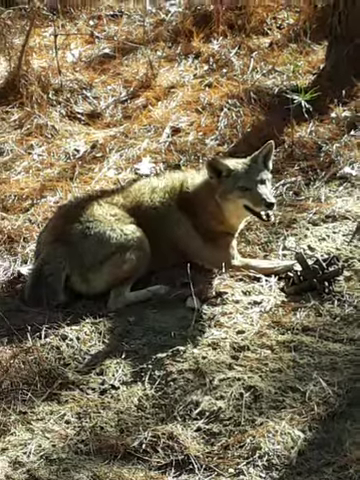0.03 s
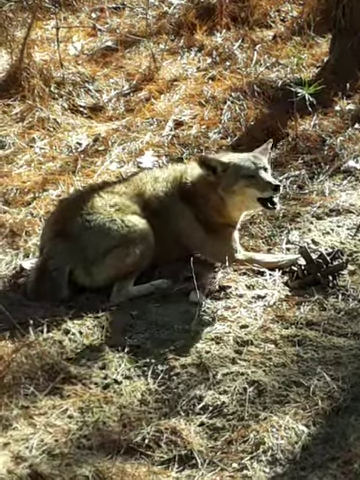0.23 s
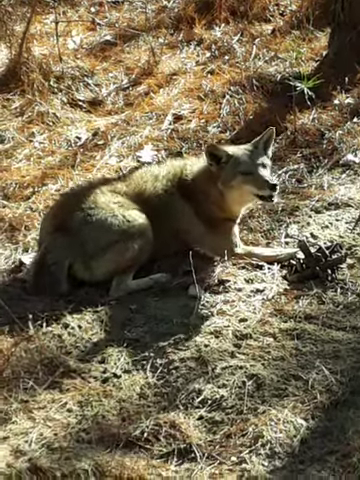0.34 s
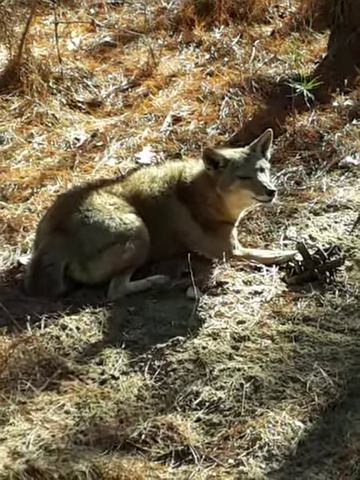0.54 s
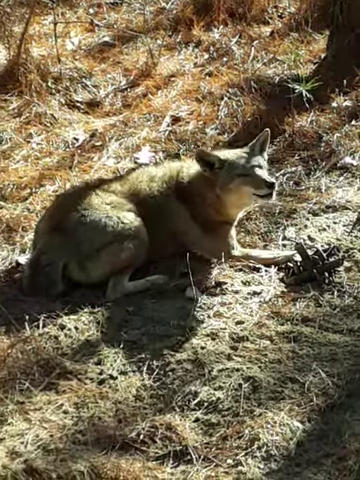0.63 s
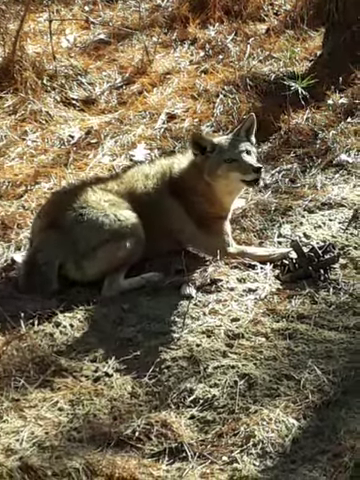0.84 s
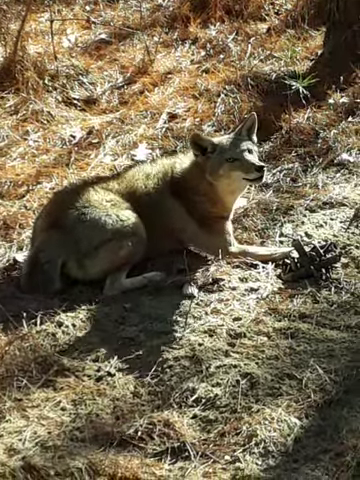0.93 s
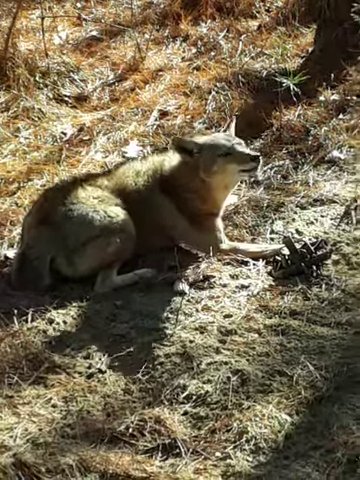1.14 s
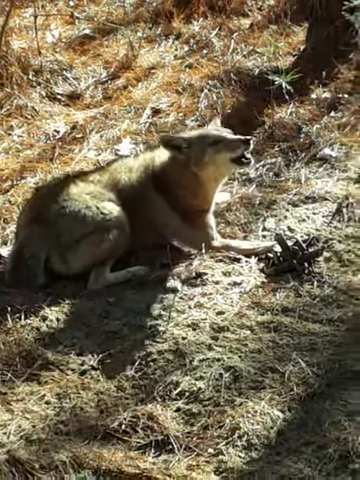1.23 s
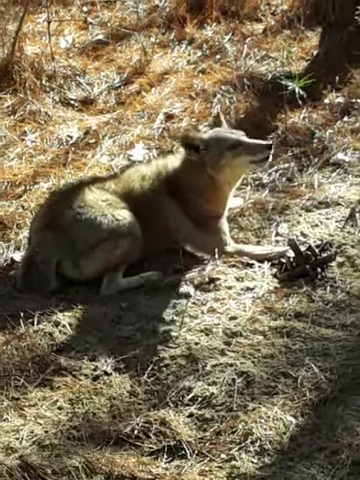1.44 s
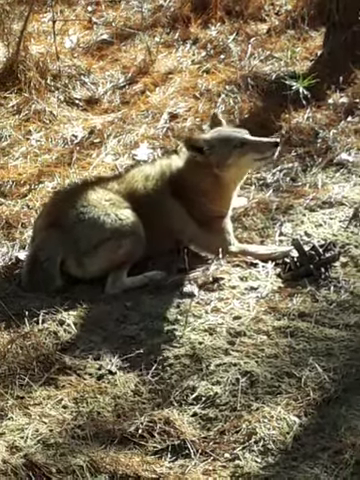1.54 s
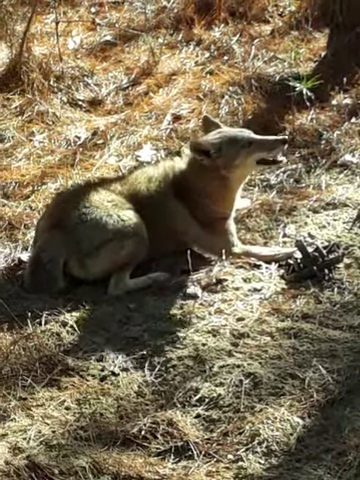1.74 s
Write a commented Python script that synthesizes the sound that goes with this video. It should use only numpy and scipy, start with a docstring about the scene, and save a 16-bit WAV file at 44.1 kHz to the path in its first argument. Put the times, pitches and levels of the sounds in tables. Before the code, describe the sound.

Slightly left of the microphone, a coyote growls softly and breaks into three raspy barks that rise in pitch. Each leaves a long echo in the trees, with the growl continuing between them in otherwise quiet open air.

```python
"""Dry grass among trees: a coyote lying a little to the left barks three times over its own low growl.
Each bark swells out of the growl: the vocal folds jitter and the throat flutters as the pitch rises,
steadies near the top, then sags as the mouth shuts. Air hisses through the teeth at each opening.
The trees return a long echo; dry stalks tick and something rustles faintly over a quiet background."""
import sys
import numpy as np
from scipy import signal
from scipy.fft import rfft, irfft, next_fast_len
from scipy.io import wavfile
from scipy.ndimage import uniform_filter1d, minimum_filter1d

SR = 44100
rng = np.random.default_rng(int(sys.argv[2]) if len(sys.argv) > 2 else 0)


def wav_record(signal):
    """Record a signal, one row per channel, as 16-bit PCM in the file named by sys.argv[1]."""
    frames = np.transpose(np.atleast_2d(signal))
    bounded = np.clip(frames, -1, 1)
    # unit amplitude maps onto the largest positive 16-bit level
    quanta = np.round(bounded * 32767).astype(np.int16)
    wavfile.write(sys.argv[1], SR, quanta)


N = 79380
TIME_S = np.arange(N) / SR
CHEST_CUT_HZ = 321


def bark(curve, rough_rise, rough_top, flutter_top, growl_phase):
    """Jittering vocal folds, shaken by growl and throat flutter, rasping each cycle: (start s, sound)."""
    # Throat colour of overtones and of rasp. Each row: frequency in Hz, gain in dB.
    overtone_colour = [(600, 0), (1350, 0), (1620, -1), (1900, 6), (2120, -18), (2500, -17.5), (2850, -15),
                       (4000, -37.5)]
    rasp_colour = [(100, -37), (330, -20), (480, -6), (720, -23), (900, 11), (1130, 13.5), (1380, -17.5),
                   (1650, -1.5), (1900, 0), (2300, -13.5), (2850, -18.5), (3450, -20.5), (4150, -36.5),
                   (5000, -23), (5600, -21.5), (6400, -27), (7200, -25), (8200, -41.5), (15500, -45.5)]
    # Thinning of the rasp once the voice steadies. Each row: frequency in Hz, gain in dB.
    clearing = [(1900, -6.5), (2800, -.5)]
    steady_after_s, steadying_s, edge_s = .056, .014, .012
    flutter_hz, flutter_rise = 105, .42
    s, *columns = np.transpose(curve)
    span = slice(round(s[0] * SR), round(s[-1] * SR))
    t = TIME_S[span]
    hz, first_db, octave_db, upper_db = (gesture(t, s, column) for column in columns)
    rising = (1 - np.tanh((t - s[0] - steady_after_s) / steadying_s)) / 2
    rough = rough_top + (rough_rise - rough_top) * rising
    flaps = np.cos(2 * np.pi * np.cumsum(flutter_hz * (1 + wobble(flutter_hz)[span] / 2)) / SR)
    flutter = (flutter_top + (flutter_rise - flutter_top) * rising) * flaps
    jitter = .05 * rough * wobble(rate_hz=380)[span]
    phase = 2 * np.pi * np.cumsum(hz * (1 + jitter + .1 * flutter)) / SR
    shake = rough * (.45 * wobble(rate_hz=320)[span] + .5 * np.cos(growl_phase[span]))
    closing = phase + .75 * rough ** 2 * wobble(rate_hz=300)[span]  # folds close unevenly
    orders = np.arange(3, 8)[:, None]
    upper = levelled(colour(np.cos(orders * closing).sum(0) * (1 + shake), overtone_colour))
    fundamental = amp(first_db + 1.5) * np.sin(phase) * (1 + shake / 2 + rising * flutter)
    octave = amp(octave_db) * np.cos(2 * closing) * (1 + shake)
    overtones = amp(upper_db) * upper / np.sqrt(2) - octave
    puffs = (1 + np.cos(phase) / 2) * (1 + shake / 2) * rng.standard_normal(N)[span]
    push = np.hypot(amp(upper_db), amp(octave_db - 14))  # rasp follows the overtones
    rasp = levelled(colour(puffs, rasp_colour)) * push * amp(2.5)
    rasp = rising * rasp + (1 - rising) * colour(rasp, clearing)
    voice = np.sqrt(2) * (fundamental + overtones * (1 + flutter)) + rasp * (1 + flutter / 2)
    edges = np.clip(np.minimum(t - s[0], s[-1] - t) / edge_s, 0, 1)
    return s[0], butterworth(voice * edges, 4, CHEST_CUT_HZ, "highpass")


def gesture(t, s, points, glide_s=.009):
    """Joins the points of a curve, rounding the corners as muscles do."""
    return uniform_filter1d(np.interp(t, s, points), size=round(glide_s * SR), mode="nearest")


def growl():
    """Slow, uneven pulses, each with a puff of rasp, behind a nearly shut mouth: (sound, phase)."""
    # Course of the growl. Each row: time in seconds, pitch in Hz, level in dB.
    course = [(0.159, 89.72, -57), (.195, 154.3, -38.5), (.23, 252.7, -27), (0.269, 246.7, -49),
              (.305, 241.5, -56), (0.33, 162.3, -34), (.36, 104.1, -45.5), (0.42, 76.3, -55.5),
              (.55, 86.6, -49), (0.653, 79.8, -47.5), (0.686, 208.7, -32.5), (0.72, 237.8, -40),
              (0.753, 262.5, -59.5), (0.795, 176.2, -38.5), (0.825, 109.9, -44.5), (0.938, 91.65, -51),
              (1.009, 84.17, -48.5), (1.158, 82.6, -49.5), (1.198, 185.4, -35), (1.231, 234, -37),
              (1.261, 260.5, -44.5), (1.299, 188.5, -41.5), (1.34, 100.9, -42), (1.381, 75.2, -62),
              (1.508, 81.25, -52), (1.59, 73, -53.5), (1.615, 68.8, -86)]
    # Muzzle filter. Each row: frequency in Hz, gain in dB.
    muzzle = [(35, -35), (78, -7.5), (170, -1), (250, 4.5), (340, -20), (450, -11.5), (1200, -55.5)]
    tighten_hz, wobble_hz = 90, 70
    s, pitch_hz, level_db = np.transpose(course)
    hz = np.interp(TIME_S, s, pitch_hz)
    loose = np.minimum(tighten_hz / hz, 1)  # higher pitch tightens and clears the voice
    jitter = .055 * loose * wobble(wobble_hz)
    phase = 2 * np.pi * np.cumsum(hz * (1 + jitter)) / SR
    orders = np.arange(1, 13)[:, None]
    gains = amp(read(muzzle, orders * hz))
    pulses = (gains * np.cos(orders * phase)).sum(0) / np.sqrt((gains ** 2).sum(0) / 2)
    rasp = unit(colour((1 + np.cos(phase)) * rng.standard_normal(N), muzzle))
    shimmer = .28 * wobble(wobble_hz)
    voice = pulses * (1 + shimmer) + .3 * loose * rasp
    return voice * amp(np.interp(TIME_S, s, level_db, -np.inf, -np.inf)), phase


def teeth_hiss():
    """Air hisses through the teeth as each bark opens."""
    # Each row: centre in seconds, peak level in dB.
    hisses = [(.208, -56.5), (0.707, -44.5), (1.223, -47)]
    # Hiss spectrum. Each row: frequency in Hz, gain in dB.
    teeth = [(2000, -31), (4200, -28.5), (5200, -0.5), (6000, -4), (6900, -22.5), (9000, -33)]
    envelope = sum(amp(db) * swell(s, width_s=.0087) for s, db in hisses)
    return envelope * unit(colour(rng.standard_normal(N), teeth))


def coyote():
    """One throat: the growl, three barks riding on it, and their hiss."""
    # One curve per bark. Each row: time in seconds, pitch in Hz, then drive in dB
    # of the fundamental, the octave and the upper overtones.
    first = [(.178, 165.5, -33, -54, -56.5), (.208, 347.1, -29.5, -42, -55), (.222, 427, -19, -45, -36),
             (.238, 467.2, -17.5, -34, -27), (0.256, 548.3, -15.5, -18.5, -17.5),
             (0.269, 565.4, -15.5, -21.5, -22.5), (0.277, 541.2, -23, -7, -11),
             (0.297, 614.3, -14.5, -20, -28), (0.309, 608.3, -22, -17, -15.5),
             (0.32, 578, -15.5, -22.5, -29), (0.34, 497, -41, -30.5, -50)]
    second = [(.67, 186.6, -55, -51.5, -77), (.686, 309.7, -40.5, -60, -59), (.701, 428.4, -20.5, -36, -32),
              (0.722, 490.4, -19, -41.5, -20), (0.733, 559.8, -15.5, -29.5, -16),
              (0.74, 609, -15, -12.5, -20), (0.756, 590.6, -13.5, -18.5, -17),
              (0.769, 593.4, -7.5, -15.5, -14), (0.773, 571, -30, -6.5, -29.5),
              (0.789, 528.3, -33, -21.5, -42), (0.811, 470, -40, -32, -43)]
    third = [(1.18, 201.1, -34, -72, -73.5), (1.199, 300.7, -46.5, -44.5, -69.5),
             (1.214, 427, -24, -31, -37.5), (1.23, 479.6, -23, -22, -25), (1.245, 563.1, -21.5, -22.5, -19),
             (1.263, 588.1, -10, -12.5, -14), (1.272, 552.4, -17, -17.5, -26),
             (1.279, 540, -53, -13, -26.5), (1.298, 525, -23.5, -24, -52), (1.314, 452, -38, -47.5, -55)]
    # Each row, one per bark: roughness while rising, roughness at the top, flutter at the top, all 0-1.
    roughness = [(.8, .36, .36), (.8, .15, .08), (.85, .2, .14)]
    voice, growl_phase = growl()
    for curve, depths in zip([first, second, third], roughness):
        add(voice, *bark(curve, *depths, growl_phase))
    return voice + teeth_hiss()


def trees(voice):
    """Scattered reflections: a short burst from near ground and trunks, then a long echo."""
    # Colour of both. Each row: frequency in Hz, gain in dB.
    echo_colour = [(100, -28.5), (300, -7), (510, -4.5), (605, 0.5), (740, 1.5), (1100, -10.5), (1750, -4),
                   (2100, 9), (2800, -3.5), (3900, 0), (5500, -6), (12000, -1.5)]
    # Decay of the long echo. Each row: frequency in Hz, T60 in seconds.
    far_decay = [(200, 0.41), (600, 1.31), (1100, 0.98), (12000, 1.2)]
    hz, t, spectra = signal.stft(rng.standard_normal((2, N_ECHO := SR)), SR, nperseg=256)
    response = np.zeros(N)

    def scatter(noise, delay_s, t60_s, gain_db):
        tail = signal.istft(noise * amp(-60 * t / t60_s), SR, nperseg=256)[1][:N_ECHO]
        add(response, delay_s, amp(gain_db) * tail / np.linalg.norm(tail))

    scatter(spectra[0], delay_s=.073, t60_s=read(far_decay, hz)[:, None], gain_db=-25)
    scatter(spectra[1], delay_s=.015, t60_s=.24, gain_db=-9.5)
    return colour(signal.fftconvolve(voice, response)[:N], echo_colour)


def trunks(voice, turn_s=1.15, turn_db=4):
    """Two trunks throw back dull echoes, louder once the head turns to them before the last bark."""
    # Each row: delay in seconds, gain in dB before the turn and the filter.
    echoes = [(.05, -22), (.125, -27.5)]
    turned = (np.tanh((TIME_S - turn_s) * 20) + 1) / 2
    thrown = voice * amp(turn_db * turned)
    out = np.zeros(N)
    for delay_s, db in echoes:
        add(out, delay_s, amp(db) * thrown)
    return butterworth(out, 1, [CHEST_CUT_HZ, 540], "bandpass")


def stalks(decay_s=.002):
    """Dry grass snaps faintly."""
    # Each row: start in seconds, level in dB before the filter.
    ticks = [(.1126, -55), (.134, -59), (.427, -51), (.531, -58)]
    # Stalk filter. Each row: frequency in Hz, gain in dB.
    stalk_colour = [(1000, -15), (3000, -1.5), (6800, 6), (9000, -11.5)]
    out, t = np.zeros(N), np.arange(1024) / SR
    for s, db in ticks:
        add(out, s, amp(db) * rng.standard_normal(len(t)) * np.exp(-t / decay_s))
    return colour(out, stalk_colour)


def rustle(peak_db=-70):
    """A faint airy rustle swells and fades after the last bark."""
    # Lower and upper band edge in Hz.
    band_hz = [3500, 4700]
    noise = unit(butterworth(rng.standard_normal(N), 2, band_hz, "bandpass"))
    return amp(peak_db) * swell(centre_s=1.45, width_s=.08) * noise


def air(midway_db=-63.5, fade_db_per_s=4.5, spread=.083):
    """Soft outdoor rumble and hiss, mostly shared by both sides, slowly ebbing."""
    # Each row: frequency in Hz, relative density in dB.
    spectrum = [(25, -23), (60, -4.5), (100, 1.5), (280, -15), (550, -12.5), (2000, -24), (3500, -30),
                (9000, -37), (15500, -31.5)]
    shared, left, right = colour(rng.standard_normal((3, N)), spectrum)
    level_db = midway_db - fade_db_per_s * (TIME_S - N / SR / 2)
    return amp(level_db) * unit(shared + spread * np.array([left, right]))


def amp(db):
    """Decibels to gain."""
    return 10 ** (np.asarray(db) / 20)


def unit(x):
    """Scales to an rms of one."""
    return x / np.sqrt(np.mean(x ** 2) + 1e-20)


def levelled(x):
    """Holds the running rms at one."""
    return x / np.sqrt(abs(uniform_filter1d(x ** 2, size=400)) + 1e-12)


def read(points, hz):
    """Interpolates a table on a log frequency axis."""
    f, value = np.transpose(points)
    return np.interp(np.log(hz + 1), np.log(f + 1), value)


def colour(x, points):
    """Filters by a spectrum in dB."""
    size = next_fast_len(x.shape[-1] + 2048)
    gains = amp(read(points, np.fft.rfftfreq(size, 1 / SR)))
    return irfft(rfft(x, size) * gains, size)[..., :x.shape[-1]]


def butterworth(x, order, hz, kind):
    """Causal Butterworth filter."""
    return signal.sosfilt(signal.butter(order, hz, kind, fs=SR, output="sos"), x)


def wobble(rate_hz):
    """Random drift of rms one, up to the given rate."""
    hz = np.fft.rfftfreq(N, 1 / SR)
    band = hz / (hz + rate_hz / 5) / np.sqrt(1 + (hz / rate_hz) ** 6)
    return unit(irfft(rfft(rng.standard_normal(N)) * band, N))


def swell(centre_s, width_s):
    """Gaussian envelope, peak one."""
    return np.exp(-((TIME_S - centre_s) / width_s) ** 2 / 2)


def add(mix, start_s, sound):
    """Mixes a sound in place."""
    part = mix[max(round(start_s * SR), 0):][:len(sound)]
    part += sound[:len(part)]


def scene():
    """The animal, its echoes and the background, leaning left."""
    # Each row: frequency in Hz, left minus right in dB.
    balance = [(60, 0), (200, 5.5), (4000, 6.3), (13000, 4.5)]
    voice = coyote()
    left, right = voice + trees(voice) + trunks(voice) + stalks() + rustle() + air()
    return np.array([colour(left, [(hz, db / 2) for hz, db in balance]),
                     colour(right, [(hz, -db / 2) for hz, db in balance])])


def record(dry):
    """Quick peak limiter, then a low-pass."""
    ceiling, hold_s, cutoff_hz = .98, .005, 15850
    size = round(hold_s * SR)
    gain = ceiling / np.maximum(abs(dry).max(0), ceiling)
    held = dry * uniform_filter1d(minimum_filter1d(gain, size), size)
    lowpass = signal.firwin(511, cutoff_hz, window=("kaiser", 9), fs=SR)
    return signal.oaconvolve(held, lowpass[None], "same")


dry = scene()
out = record(dry)
wav_record(out)
```